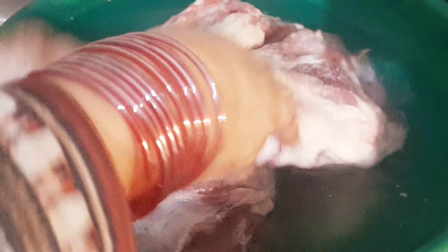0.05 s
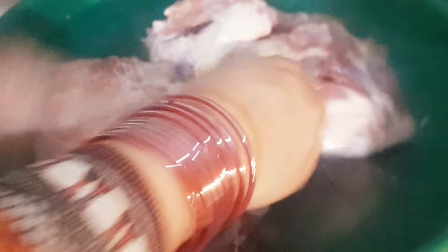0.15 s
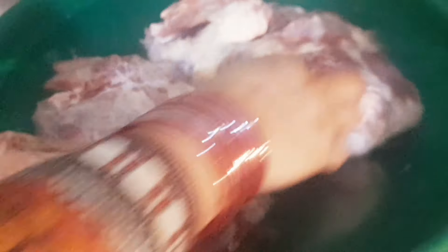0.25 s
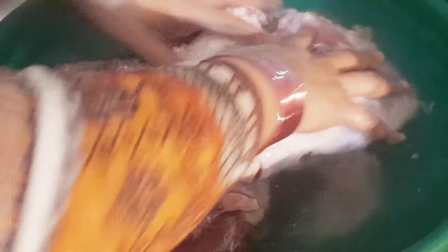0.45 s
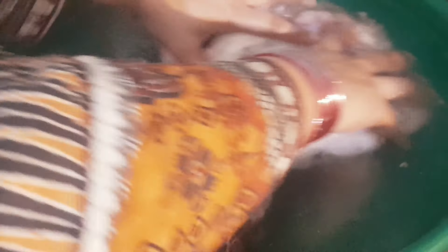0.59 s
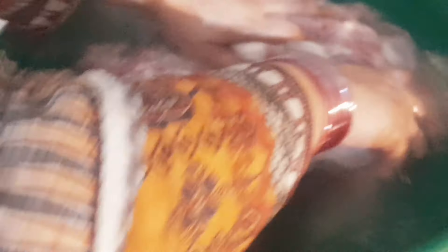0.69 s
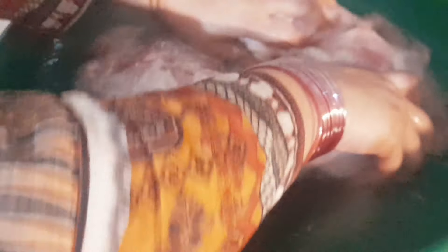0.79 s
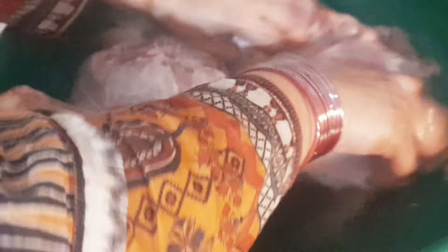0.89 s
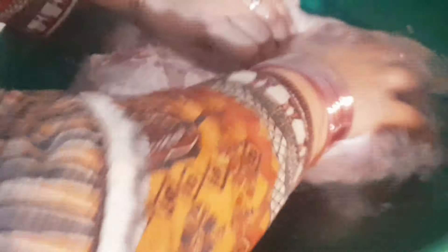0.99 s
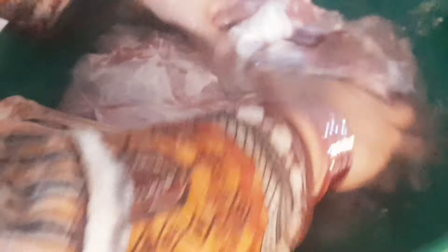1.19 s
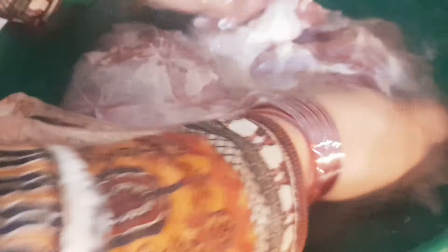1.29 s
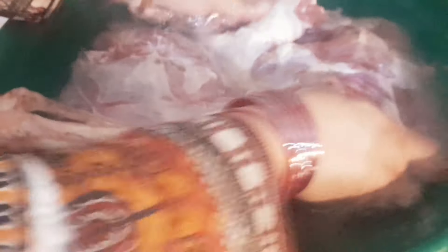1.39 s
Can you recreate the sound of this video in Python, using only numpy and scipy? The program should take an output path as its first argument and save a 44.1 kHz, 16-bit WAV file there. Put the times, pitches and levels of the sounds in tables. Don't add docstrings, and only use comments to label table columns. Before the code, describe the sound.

Water sloshing and plopping in a plastic tub as hands wash meat, after one hollow knock

```python
import sys
import numpy as np
from scipy import signal
from scipy.fft import rfft, irfft, next_fast_len
from scipy.io import wavfile
from scipy.ndimage import uniform_filter1d, map_coordinates

SR = 44100
rng = np.random.default_rng(int(sys.argv[2]) if len(sys.argv) > 2 else 0)


def store_wav(level_fs):
    pcm = np.round(np.clip(np.atleast_2d(level_fs), -1, 1) * 32767)
    wavfile.write(sys.argv[1], SR, pcm.T.astype(np.int16))


def decibels_to_gain(level_db):
    exponent = np.asarray(level_db, float) / 20
    return 10 ** exponent


N = 63945

# pitch in Hz, level in
# dB, time to fall 60 dB in seconds.
KNOCK_MODES = [(292.3, -4, 0.65), (391.5, -5.5, 0.36), (438, -19, 0.48), (502.5, -8, 0.43), (559.6, -3, 0.24),
               (631.4, -4, 0.46), (849, -17, 0.27), (947, -12, 0.22), (1024, -9, 0.48), (1058, -8, 0.16),
               (1200, -8.5, 0.42), (1830, -9.5, 0.16),
               (59.9, -22, 0.93), (95, -11, .6), (133, -9, 0.41), (251.3, -9.5, .5)]
# pitch in Hz, level in dB, 60 dB fall in seconds.
SNAP_MODES = [(969, 5.5, 0.012), (624, -8, 0.02), (1400, -5, 0.015), (2060, -12.5, 0.019),
              (2615, -9.5, 0.015), (4750, -17.5, 0.0073), (5800, -12, 0.0095), (6920, -13.5, 0.0061)]
# frequency in Hz, level in dB per Hz.
ECHO_COLOUR = [(96, -14), (200, -24), (300, -9.5), (1200, -19.5), (2700, -30), (3300, -36.5), (7200, -41),
               (8600, -54)]
# frequency in Hz, level in dB per Hz.
SPLASH_COLOUR = [(7000, -20), (9000, -2.5), (12000, 4.5), (15500, -12), (16200, -32.5)]
# frequency in Hz, 60 dB fall in seconds.
KITCHEN_DECAY = [(100, 0.81), (400, 0.65), (1100, 0.74), (3000, 0.6), (8000, 0.48), (15000, 0.56)]
# start in seconds, peak in dB, pitch in Hz, 60
# dB fall in seconds, pitch rise as a share.
BUBBLE_EVENTS = [(0.6335, -38, 3630, 0.013, 0.086), (0.6657, -37, 4440, 0.0071, 0.21),
                 (0.6753, -37.5, 1740, 0.019, 0.39), (0.694, -39.5, 935, 0.029, 0.09),
                 (0.694, -35.5, 1430, 0.0088, 0.12), (0.661, -47, 2010, 0.012, .4),
                 (.724, -37, 2200, 0.0085, .1), (0.738, -34, 1002, 0.019, 0.086),
                 (0.7652, -20, 2420, 0.018, 0.37), (0.9517, -43, 1580, 0.017, 0.36),
                 (0.9704, -43, 1200, 0.014, 0.31), (0.9928, -44, 1370, 0.016, 0.53),
                 (1.043, -45.5, 1673, 0.023, 0.23), (1.0627, -39, 2835, 0.024, 0.32),
                 (1.075, -23.5, 2006, 0.0077, 0.062), (1.174, -47, 847, 0.027, 0.09),
                 (1.2004, -28, 1430, 0.0066, 0.32), (1.219, -38, 2300, 0.009, 0.1),
                 (1.2376, -28.5, 2170, 0.01, 0.1), (1.2653, -26, 1198, 0.014, 0.18),
                 (1.268, -22, 1655, 0.015, 0.22), (1.275, -27.5, 1910, .016, .15),
                 (1.277, -36, 3000, .007, 0.45), (1.294, -38, 2700, .007, .1),
                 (1.4, -37.5, 3180, 0.0068, .3), (1.2787, -29.5, 1115, 0.018, 0.24),
                 (1.2971, -20.5, 1880, 0.016, 0.13), (1.352, -26, 2120, 0.015, 0.32),
                 (1.382, -30, 4200, 0.007, 0.25), (1.3883, -21, 1390, 0.019, 0.33),
                 (1.387, -28.5, 1002, .01, .1), (1.198, -34.5, 990, 0.01, 0.092)]
# start in seconds, level in dB, pitch in
# Hz.
GLUG_EVENTS = [
    (0.24, -6, 425),
    (0.245, -3, 320),
    (.244, -17.5, 129),
    (.3135, -12.5, 301),
    (1.277, -20, 377),
    (1.266, -20, 141),
    (1.345, -27, 130),
    (1.327, -23, 330),
    (1.39, -21, 480),
]
# start in seconds, peak in dB, pitch in Hz.
DROPLET_EVENTS = [(0.6671, -22.5, 4540), (.669, -36, 3820), (0.782, -33, 7170), (0.9716, -24.5, 7000),
                  (1.0133, -28, 5800), (1.054, -29.5, 12640), (1.064, -36, 12900), (1.0814, -35.5, 12600),
                  (1.1, -34.5, 7550), (1.1418, -34, 10300), (1.234, -33, 4330), (1.285, -28.5, 8100),
                  (1.2949, -21.5, 6700), (1.3556, -11.5, 6340), (1.3817, -27.5, 11600), (1.397, -36, 6100)]
# start in seconds, peak in dB, pitch in Hz,
# cycles to die away.
DRIP_EVENTS = [
    (.1845, -33, 1500, 4),
    (.1855, -34, 5500, 8),
    (.196, -41, 2100, 22),
    (.188, -38, 2300, 6),
    (.741, -31, 1700, 14),
    (1.018, -35, 3900, 25),
    (1.081, -29, 3600, 35),
    (1.386, -21, 3800, 25),
]
# start in seconds, peak in dB, pitch in Hz.
TICK_EVENTS = [(.1955, -34.5, 6200), (.660, -42, 6500), (.679, -38, 9200), (.697, -44, 8000),
               (.781, -36, 5000), (.933, -44.5, 14000), (.935, -53.5, 6530), (.941, -43, 10500),
               (.944, -51, 5400), (.965, -49, 11100), (.969, -39, 13000), (.975, -41.5, 12500),
               (.975, -31, 4630), (.988, -45.5, 11500), (1.014, -48, 13500), (1.021, -39, 7500),
               (1.056, -33.5, 7900), (1.066, -48, 14500), (1.118, -38, 12000), (1.131, -38, 14500),
               (1.134, -37, 6500), (1.148, -38, 6000), (1.165, -42, 13500), (1.186, -35, 5500),
               (1.189, -43, 9500), (1.199, -33, 4800), (1.200, -50, 8500), (1.209, -36, 13600),
               (1.223, -44, 6000), (1.232, -36.5, 7500), (1.242, -39, 12500), (1.256, -31, 4700),
               (1.274, -35, 10500), (1.274, -45, 14000), (1.284, -39, 4800), (1.294, -41, 12500),
               (1.299, -28, 8200), (1.306, -44, 6800), (1.325, -36.5, 6800), (1.356, -41, 13500),
               (1.360, -38, 14500), (1.377, -37, 6470), (1.383, -38, 14500), (1.397, -37, 10000),
               (1.406, -43, 13500)]
# start in seconds, peak in dB, tilt in dB per octave.
CLINK_EVENTS = [
    (.1425, -33, 4),
    (.4633, -33, 12),
]
# pitch in Hz, level in dB, 60 dB fall in seconds.
BANGLE_MODES = [(5220, -9, 0.2), (9580, -11, 0.23), (10100, -6.5, 0.14), (14000, -14, 0.18),
                (14430, -17, 0.22)]
# start in seconds, peak in dB.
THIN_CLINK_EVENTS = [
    (.381, -48.5),
    (.424, -54),
    (.435, -52),
    (1.058, -48),
]
# pitch in Hz, level in dB, 60 dB fall in seconds.
THIN_BANGLE_MODES = [(12000, -3, .05), (12700, 0, .07), (13400, -2, .05)]
# time in seconds, level in dB.
STIR_CURVE = [(0, -52.5), (.09, -70.5), (.55, -61), (.62, -51.5), (.68, -51), (.8, -54), (.86, -62),
              (.93, -71), (.97, -53), (1.07, -55), (1.11, -67), (1.16, -59.5), (1.19, -50), (1.25, -53.5),
              (1.29, -45), (1.33, -51), (1.39, -43), (1.45, -57.5)]
# frequency in Hz, level in dB per Hz.
SLOSH_COLOUR = [(300, -29), (1500, 3), (3000, 2), (7000, -2), (8500, -14), (12500, -4), (15600, -10),
                (16200, -41.5)]
# time in seconds, level in dB.
HEAVE_CURVE = [(0, -42), (.12, -50.5), (.5, -41), (.72, -43.5), (.9, -48.5), (1.01, -45.5), (1.1, -52.5),
               (1.28, -38), (1.45, -42.5)]
# frequency in Hz, level in dB per Hz.
RUMBLE_COLOUR = [(40, -58.5), (200, -35.5), (450, -15.5), (900, -28.5)]
# pitch in Hz, width in Hz, level in dB.
ROOM_RESONANCES = [(63, 6.7, -2), (95.7, 29, 0.5), (140.8, 26, 2), (263, 62, -10.5), (290.8, 6.3, 1.5),
                   (335, 42, -14.5)]
# frequency in Hz, level in dB per Hz.
HISS_COLOUR = [(300, 3.5), (900, -14.5), (5000, -12), (15600, -21), (16300, -52)]
# frequency in Hz, correlation from 0 to 1.
LEFT_RIGHT_LIKENESS = [(60, 0.9), (250, 0.93), (700, 0.4), (2000, 0.19), (8000, 0.018)]


def unit(x):
    return x / np.sqrt(np.mean(x ** 2) + 1e-20)


def along(points, hz):
    f, value = np.transpose(points)
    return np.interp(np.log(hz + 1), np.log(f + 1), value)


def curve(rows):
    return np.interp(np.arange(N) / SR, *np.transpose(rows))


def wobble(rate):
    return map_coordinates(rng.standard_normal(200), [np.arange(N) * rate / SR])


def filtered(x, response):
    m = next_fast_len(N + 8192)
    return irfft(rfft(x, m) * response(np.fft.rfftfreq(m, 1 / SR)), m)[..., :N]


def rush(gain):
    def mid_side(hz):
        turn = np.arccos(np.clip(along(LEFT_RIGHT_LIKENESS, hz), -1, 1)) / 2
        return gain(hz) * np.array([np.cos(turn), np.sin(turn)])

    mid, side = filtered(rng.standard_normal((2, N)), mid_side)
    return unit(np.array([mid + side, mid - side]))


def dying(x, scale):
    hz, t, z = signal.stft(x, SR, nperseg=256)
    t60 = scale * along(KITCHEN_DECAY, hz)[:, None]
    return signal.istft(z * decibels_to_gain(-60 * t / t60), SR, nperseg=256)[1][:, :x.shape[1]]


def delayed(x, seconds):
    return np.pad(x, ((0, 0), (round(seconds * SR), 0)))[:, :N]


def place(s, waves):
    at = np.round(np.asarray(s) * SR).astype(int)[:, None] + np.arange(waves.shape[1])
    return np.bincount(at.ravel(), waves.ravel(), N + SR)[:N]


def blips(db, hz, t60, rise, swell_s, size):
    glide_s = 0.0042
    t = np.arange(size) / SR
    db, t60, rise, swell_s = [np.broadcast_to(v, np.shape(hz))[:, None] for v in (db, t60, rise, swell_s)]
    glide = (1 + rise / 2) * t - rise * glide_s * (1 - np.exp(-t / glide_s))
    swell = (1 - np.exp(-t / swell_s)) ** 2
    return decibels_to_gain(db - 60 * t / t60) * np.sin(2 * np.pi * hz[:, None] * glide) * swell


def knock():
    knock_s, splash_s = .2303, .2355

    hz, db, t60 = np.transpose(KNOCK_MODES)
    swell_s = .013 / (1 + (hz / 450) ** 2)
    rings = blips(db - 14, hz, t60, 0, swell_s, size=SR)
    rings = rings * decibels_to_gain(1.5 * np.array([wobble(45)[:SR] for _ in hz]))
    lean_db = 2 * rng.standard_normal(len(hz))[:, None] * (hz[:, None] > 450)
    ring = np.array([place([knock_s], (rings * decibels_to_gain(k * lean_db)).sum(0)[None]) for k in (1, -1)])

    hz, db, t60 = np.transpose(SNAP_MODES)
    snap = place(hz * 0 + knock_s, blips(db + 3.5, hz, t60, 0, 0.00079, size=2048))
    snap = snap * decibels_to_gain([[-2], [1.5]])

    echo = dying(rush(lambda f: decibels_to_gain(along(ECHO_COLOUR, f)) * (f > 44)), scale=0.87)
    echo = echo * (1 - np.exp(-np.arange(N) / SR / 0.00065))
    spray = dying(rush(lambda f: decibels_to_gain(along(SPLASH_COLOUR, f)) * (f > 6000)), scale=0.57)
    return ring + snap + decibels_to_gain(-13) * delayed(echo, knock_s) + decibels_to_gain(-39) * delayed(spray, splash_s)


def bubbles():
    s, db, hz, t60, rise = np.transpose(BUBBLE_EVENTS)
    return place(s, blips(db + 13, hz, t60, rise, .11 * t60, size=2048))


def air_pockets():
    s, db, hz = np.transpose(GLUG_EVENTS)
    return place(s, blips(db, hz, 11 / hz, 0, 0.97 / hz, size=4096))


def droplets():
    bright = [(*d, 30) for d in DROPLET_EVENTS]
    ticks = [(s, db + 4, hz, .0022 * hz) for s, db, hz in TICK_EVENTS]
    s, db, hz, cycles = np.transpose(DRIP_EVENTS + bright + ticks)
    t = np.arange(800) / SR
    draw = rng.standard_normal((len(s), 800))
    crack = .1 * draw * decibels_to_gain(db[:, None] - 60 * t / .012) * (1 - np.exp(-t / .001))
    ring = blips(db, hz, cycles / hz, 0.077, cycles / 20 / hz, size=800)
    waves = decibels_to_gain(2.5) * (ring + np.diff(crack, prepend=0))
    lean_db = 2 * draw[:, :1]
    return np.array([place(s, waves * decibels_to_gain(k * lean_db)) for k in (1, -1)])


def clinks(hits, modes, rattle):
    out = 0
    hz, level, t60 = np.transpose(modes)
    for s, db, tilt in hits:
        ring = blips(db + level + tilt * np.log2(hz / 10000), hz, t60, 0, 0.00048, size=8192)
        shake = uniform_filter1d(rng.standard_normal(ring.shape), size=100, axis=1)
        shake = shake * 10 * hz[:, None] / 10000
        ring = (ring * (1 + rattle * shake)).sum(0)[None] / (1 + rattle)
        tick = 0.45 * rng.standard_normal((1, 8192)) * decibels_to_gain(db - 60 * np.arange(8192) / SR / 0.005)
        out = out + place([s], ring + np.diff(tick, prepend=0))
    return out


def bangles():
    thin = [(*hit, 0) for hit in THIN_CLINK_EVENTS]
    return clinks(CLINK_EVENTS, BANGLE_MODES, rattle=.8) + clinks(thin, THIN_BANGLE_MODES, rattle=6)


def grains(count, hz, spread, cycles, size):
    u, g = rng.random((count, 2)), rng.standard_normal(count)
    f = np.clip(hz * np.exp(spread * g), 200, 15500)
    size_db = -3 * np.log(u[:, 1] + .03)
    return unit(place(u[:, 0] * N / SR, blips(size_db, f, cycles / f, 0.16, .5 / f, size=size)))


def wash():
    stir = curve(STIR_CURVE)
    slosh = decibels_to_gain(stir - 1 + 4.5 * wobble(43.08)) * rush(lambda f: decibels_to_gain(along(SLOSH_COLOUR, f)))
    fizz = [grains(count=350, hz=6500, spread=.6, cycles=20, size=400) for _ in range(2)]
    return slosh + decibels_to_gain(stir - 6) * np.array(fizz)


def gurgle():
    stir = curve(STIR_CURVE)
    level_db = 1.45 * (stir - stir.max()) + stir.max() + 3
    return decibels_to_gain(level_db) * grains(count=500, hz=1722, spread=0.388, cycles=11.0, size=1500)


def kitchen(x):
    tail = dying(rng.standard_normal((2, SR // 2)), scale=0.67)
    late = np.pad(x, (round(0.0028 * SR), 0))[None]
    return decibels_to_gain(-6.5) * signal.fftconvolve(late, tail / np.linalg.norm(tail[0]), axes=1)[:, :N]


def rumble():
    def shape(f):
        modes = sum(decibels_to_gain(db) / (1 + ((f - c) / width * 2) ** 2) for c, width, db in ROOM_RESONANCES)
        return (decibels_to_gain(along(RUMBLE_COLOUR, f)) + modes) * (f < 1500)

    low = decibels_to_gain(curve(HEAVE_CURVE) + 0.43 * wobble(12.2)) * rush(shape)
    return low + decibels_to_gain(-64) * rush(lambda f: decibels_to_gain(along(HISS_COLOUR, f)) * (f > 300))


def scene():
    near = bubbles() + gurgle() + bangles()
    spray = droplets()
    answer = kitchen(near + decibels_to_gain(-6) * spray.mean(0))
    return knock() + near + air_pockets() + spray + wash() + answer + rumble()


def band_limit(x):
    return signal.sosfilt(signal.butter(12, 16680, fs=SR, output="sos"), x)


def record(dry):
    left_db, left_lag_s = -2, .0001
    top, top_hz, bottom_hz = .99, 15900, 48
    side = np.array([[.5], [-.5]])
    x = filtered(dry, lambda hz: decibels_to_gain(side * left_db) * np.exp(-2j * np.pi * hz * side * left_lag_s))
    x = x / (1 + abs(x / top) ** 6) ** (1 / 6)
    x = filtered(x, lambda hz: (hz < top_hz) * hz ** 4 / (hz ** 4 + bottom_hz ** 4))
    return band_limit(x)


dry = scene()
out = record(dry)
store_wav(out)
```